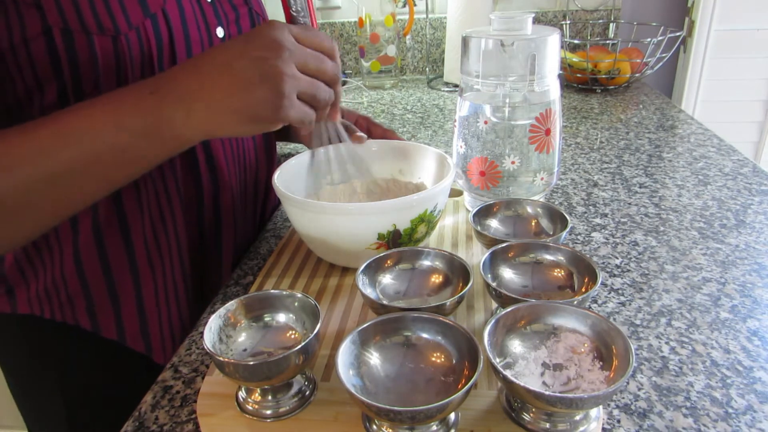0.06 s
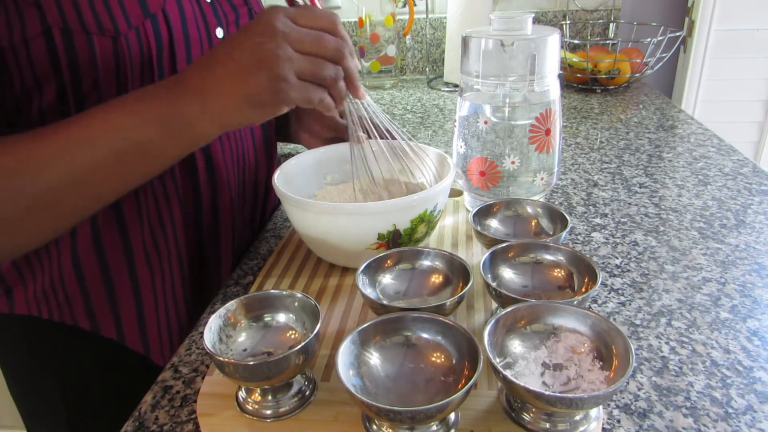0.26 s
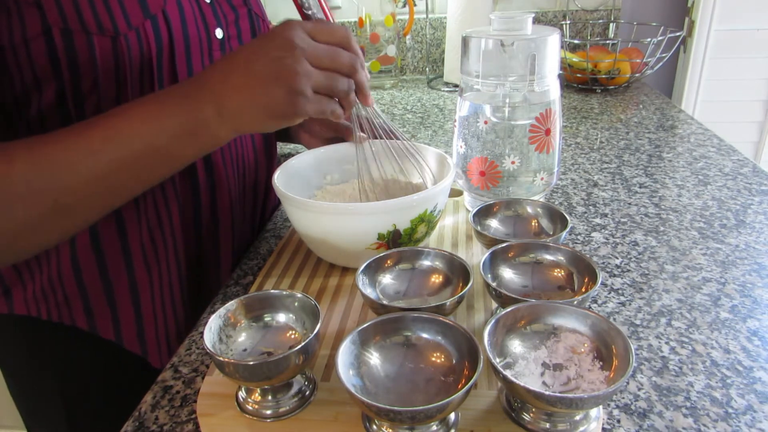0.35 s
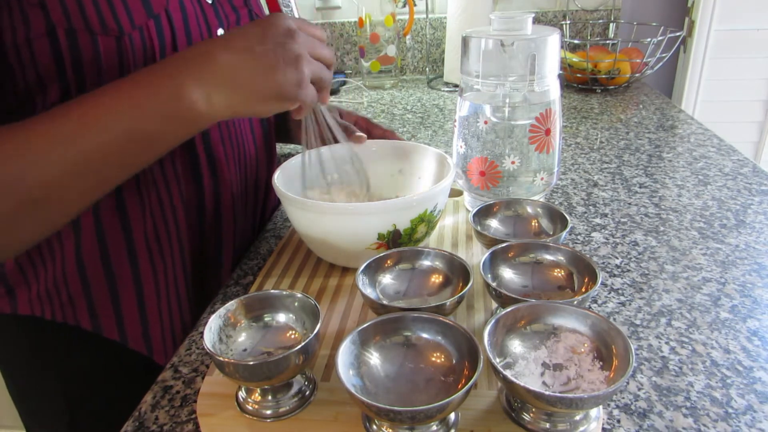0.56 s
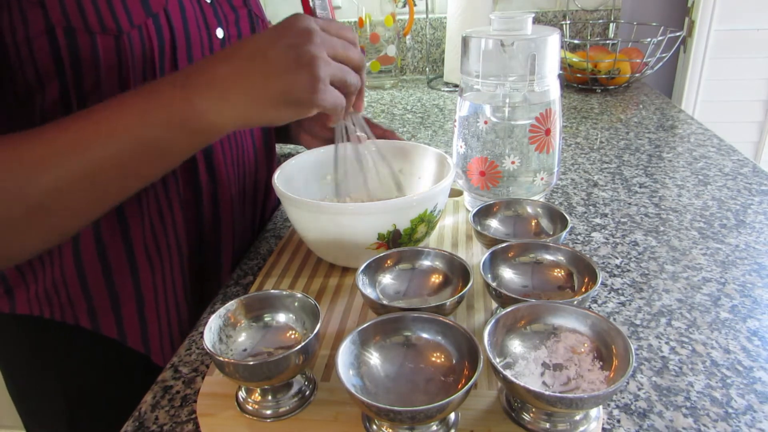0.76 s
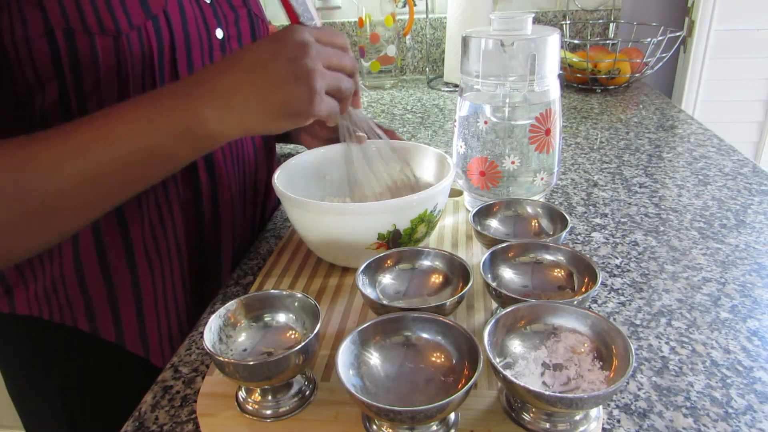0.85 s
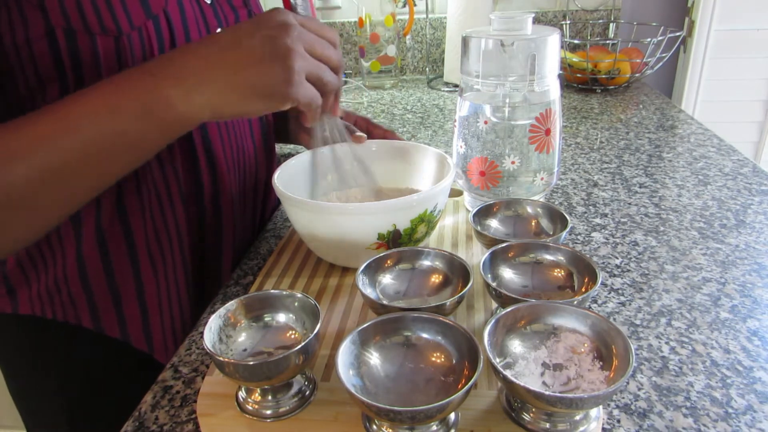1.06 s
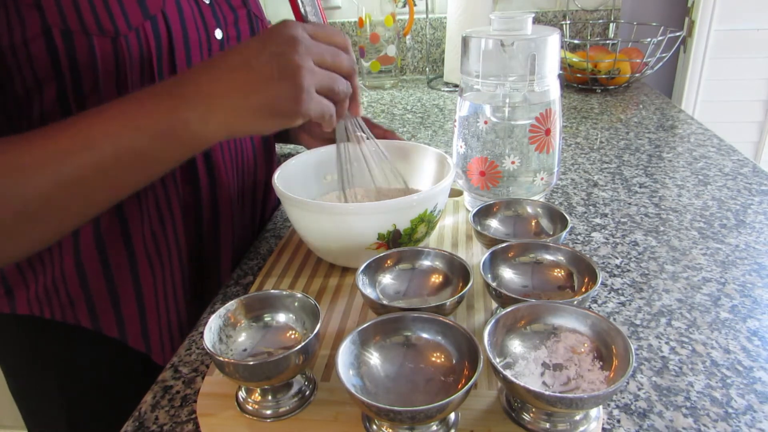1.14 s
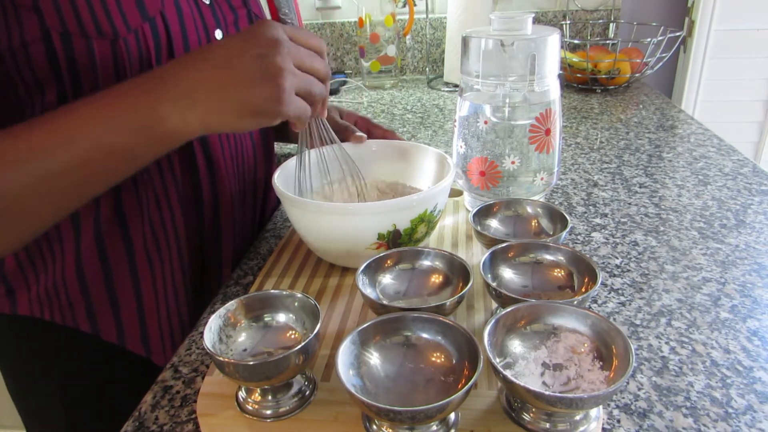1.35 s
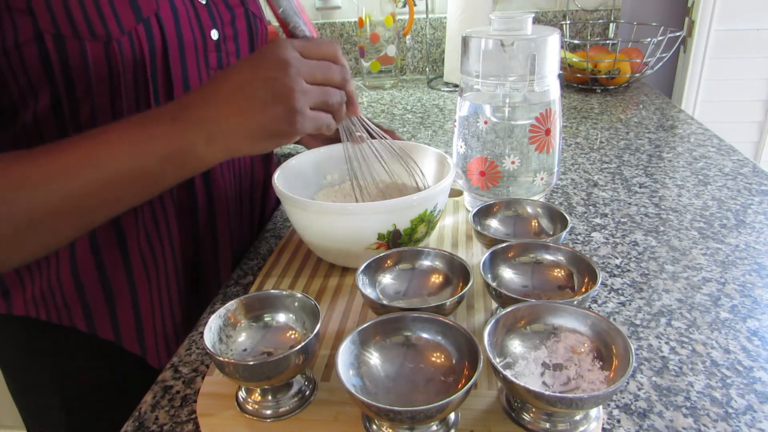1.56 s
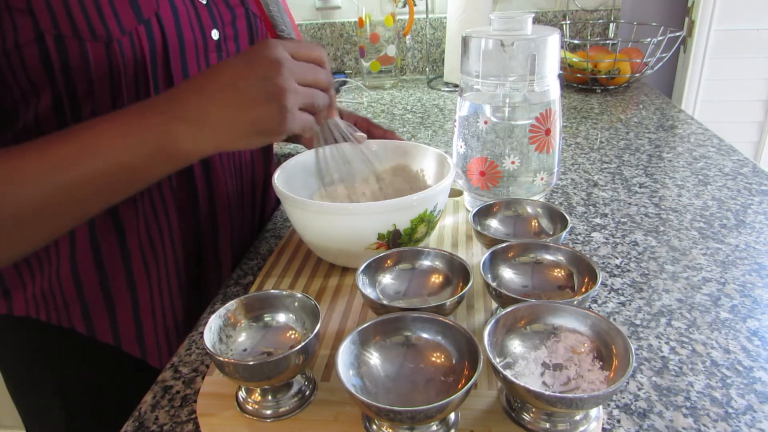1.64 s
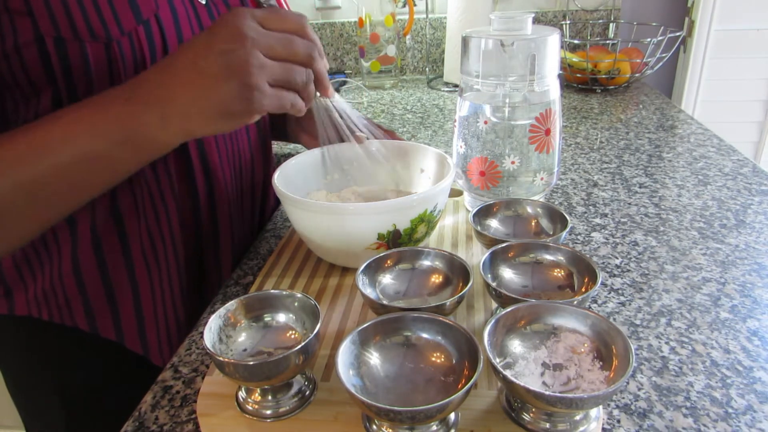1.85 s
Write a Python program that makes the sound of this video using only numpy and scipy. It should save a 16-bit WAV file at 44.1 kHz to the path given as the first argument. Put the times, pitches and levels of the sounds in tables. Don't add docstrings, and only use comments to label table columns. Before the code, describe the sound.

Whisk wires swish through dry powder and clink brightly against a ceramic bowl in a kitchen

```python
import sys
import numpy as np
from scipy import signal
from scipy.fft import rfft, irfft, next_fast_len
from scipy.io import wavfile
from scipy.ndimage import uniform_filter1d, map_coordinates

SR = 44100
rng = np.random.default_rng(int(sys.argv[2]) if len(sys.argv) > 2 else 0)


def attenuation_scalar(level_db):
    decades = np.asarray(level_db, float) / 20
    return 10 ** decades


def file_out(sig):
    cols = np.atleast_2d(sig).T
    lim = np.clip(cols, -1, 1)
    pcm = np.round(lim * 32767).astype(np.int16)
    wavfile.write(sys.argv[1], SR, pcm)


N = 83790


def unit(x):
    return x / np.sqrt(np.mean(x ** 2) + 1e-20)


def along(points, hz):
    f, v = np.transpose(points)
    return np.interp(np.log(hz + 1), np.log(f + 1), v)


def wobble(rate):
    knots = rng.standard_normal(int(N * rate / SR) + 4)
    return map_coordinates(knots, [np.arange(N) * rate / SR])


def filtered(x, response):
    n = x.shape[-1]
    m = next_fast_len(n + 8192)
    return irfft(rfft(x, m) * response(np.fft.rfftfreq(m, 1 / SR)), m)[..., :n]


def shaped_noise(n, curve):
    return unit(filtered(rng.standard_normal(n), lambda f: attenuation_scalar(along(curve, f))))


# start in seconds, then the levels in dB of the low ring,
# second ring, third ring, and the top rings with the click.
TAPS = [(.003, -51, -45, -56, -60), (.2395, -67, -30, -61, -27.5), (.2428, -23.5, -40, -29.5, -25.5),
        (.2555, -28, -55, -80, -35), (.312, -58, -30.5, -41, -48), (.385, -38.5, -42.5, -37, -52),
        (0.496, -41, -39, -58, -57), (0.571, -44.5, -64, -44.5, -51), (.837, -48, -45.5, -55, -44.5),
        (.868, -74, -70, -46.5, -47), (.8864, -61, -69, -58, -45), (.94, -51, -72, -54, -48),
        (1.053, -34, -64, -51, -46), (1.068, -45, -48, -77, -54), (1.256, -78, -68, -67, -52),
        (1.291, -47.5, -63, -48, -45.5), (1.31, -53, -68, -65, -47), (1.395, -48.5, -48, -39.5, -44),
        (1.41, -46, -41.5, -49, -45), (1.5564, -67, -39, -47, -48), (1.5988, -41, -68, -57, -39),
        (1.607, -69, -38, -69, -70), (1.8975, -31, -22.5, -28, -37.5), (1.8993, -27, -41, -20, -27)]
RING_HZ = [1610, 2950, 4620, 8830]
# pitch in Hz, level against the tap in dB, and T60 in seconds.
MODE_HZ = [630, 688, 1075, 1609.5, 2941, 2982, 4608, 4657, 5826, 6575, 8834, 9358, 11411, 14185]
MODE_DB = [-15.5, -21.5, -22, -1.5, -10.5, -21, -7.5, -9, -16, -8.5, -6, -11, -18.5, -16]
MODE_T60 = [.25, .2, .22, .26, .2, .2, .26, .12, .1, .18, .13, .1, .09, .08]
# start in seconds, loss in dB.
CHOKES = [(0.323, 6.4), (.45, 25), (.6, 11), (.91, 4), (1.139, 18), (1.35, 5.1), (1.485, 6.1), (1.582, 6.5),
          (1.68, 5.4)]
# frequency in Hz, level in dB.
CLICK = [(150, -44), (450, -3), (1500, -1.5), (3000, -2.5), (6000, -2), (10000, -8), (15000, -14)]
MODE_SCATTER_DB, ATTACK_S, CHOKE_S = -0.5, 0.0004, 0.0022
HARD_DB, TOP_RING_LOSS = -24, 0.65
MUFFLE = 1.5
ROUGH_RAD, ROUGH_DB, ROUGH_PER_S = 0.7, 1.5, 60
CLICK_DB, CLICK_T60 = -0.5, 0.053
CLANG_DB, CLANG_T60 = -8.5, 0.37
WIRE_TICKS_DB = 1.5


def unsteady_modes(hz):
    shake = np.array([[wobble(ROUGH_PER_S), wobble(ROUGH_PER_S)] for _ in hz])
    phase = 2 * np.pi * hz * np.arange(N) / SR + ROUGH_RAD * shake[:, 1]
    tones = attenuation_scalar(ROUGH_DB * shake[:, 0]) * np.sin(phase)
    return np.pad(tones, ((0, 0), (0, SR)))


def choke_loss(s, t):
    return sum(loss * np.clip((s + t - start) / CHOKE_S, 0, 1) for start, loss in CHOKES if start > s)


def click_sound(t):
    noise = shaped_noise(len(t), CLICK)
    strike = attenuation_scalar(-60 * t / CLICK_T60)
    jangle = attenuation_scalar(CLANG_DB - 60 * t / CLANG_T60)
    return attenuation_scalar(CLICK_DB) * (strike + jangle) * noise + attenuation_scalar(WIRE_TICKS_DB) * wires(t)


def taps():
    out, t = np.zeros((2, N + SR)), np.arange(SR // 3) / SR
    hz, level, t60 = np.c_[MODE_HZ], np.c_[MODE_DB], np.c_[MODE_T60]
    tones = unsteady_modes(hz)
    fade_db = -60 * (t / t60) ** MUFFLE
    for s, *ring_db, hit_db in TAPS:
        at = round(s * SR)
        top_db = hit_db + TOP_RING_LOSS * (hit_db - HARD_DB)
        tap_db = along(list(zip(RING_HZ, ring_db + [top_db])), hz)
        mode_db = tap_db + level + MODE_SCATTER_DB * rng.standard_normal(hz.shape)
        decay = attenuation_scalar(mode_db + fade_db - choke_loss(s, t))
        ring = (decay * tones[:, at:at + len(t)]).sum(0)
        click = attenuation_scalar(hit_db) * click_sound(t)
        out[:, at:at + len(t)] += np.array([ring, click]) * (1 - np.exp(-t / ATTACK_S))
    return out[:, :N]


LOW_WIRE_HZ, HIGH_WIRE_HZ, WIRE_T60, WIRE_SPREAD_S = 2474, 13220, 0.041, 0.03


def wires(t):
    pitch, late, size = rng.random((16, 3)).T[:, :, None]
    hz = LOW_WIRE_HZ * (HIGH_WIRE_HZ / LOW_WIRE_HZ) ** pitch
    since = np.maximum(t[:SR // 8] - WIRE_SPREAD_S * late ** 2, 0)
    level = attenuation_scalar(along(CLICK, hz) - 16 * size - 60 * since / WIRE_T60)
    ticks = level * np.sin(2 * np.pi * hz * since)
    return np.pad(ticks.sum(0), (0, len(t) - SR // 8))


# time in seconds, effort in dB.
STIR = [(0.0, -52.5), (0.29, -65), (0.412, -48), (0.566, -57.5), (0.82, -54), (0.946, -52), (1.078, -55),
        (1.312, -57.5), (1.496, -52.5), (1.73, -56.5), (1.9, -59.5)]
# frequency in Hz, level in dB.
FLOUR = [(700, -40), (1500, -3), (3000, 1), (5000, -0.5), (7000, -1), (10000, -7.5), (14000, -9.5),
         (16000, -35)]
FLOUR_DB, GRIT_PER_S, GRIT_DB = 2.5, 2500, 2
SING_DB, SING_WIDTH_HZ = 4.5, 45


def bowl_resonance(f):
    width = 1j * f * SING_WIDTH_HZ
    return sum(attenuation_scalar(db) * width / (c * c - f * f + width) for c, db in zip(MODE_HZ, MODE_DB))


def flour():
    s, db = np.transpose(STIR)
    effort = attenuation_scalar(np.interp(np.arange(N) / SR, s, db) + FLOUR_DB + 0.5 * wobble(22.74))
    grains = rng.random(N) < GRIT_PER_S / SR
    grit = grains * rng.standard_normal(N) * attenuation_scalar(GRIT_DB * rng.exponential(size=N))
    rub = effort * unit(unit(grit) + 0.97 * rng.standard_normal(N))
    hiss = filtered(rub, lambda f: attenuation_scalar(along(FLOUR, f)))
    return hiss + attenuation_scalar(SING_DB) * filtered(rub, bowl_resonance)


# start in seconds, level in dB, pitch in Hz.
THUDS = [(0.256, -34, 152.5), (0.249, -35.5, 202.6), (.243, -33.5, 490), (0.291, -34, 122),
         (.35, -32, 148.5), (.575, -41, 891), (0.891, -33, 159.4), (1.057, -46, 1080), (1.059, -37, 235),
         (1.06, -38, 539.5), (1.34, -38, 187.5), (1.396, -41, 1048), (1.4, -41, 574), (1.462, -35, 146),
         (1.609, -29, 148), (1.599, -37, 303.4)]
# frequency in Hz, level in dB.
PUFF = [(80, -60), (220, -3), (600, 4.5), (1300, 3.5), (3500, -11), (6000, -60)]
THUD_RISE_S, THUD_T60, THUD_ROUGH_RAD = 0.0098, 0.17, 0.3
PUFF_DB, PUFF_T60 = -10, 0.12


def board():
    out, t = np.zeros(N + SR), np.arange(SR // 2) / SR
    for s, db, hz in THUDS:
        phase = 2 * np.pi * hz * t + THUD_ROUGH_RAD * wobble(38)[:len(t)]
        note = attenuation_scalar(-60 * t / THUD_T60) * np.sin(phase)
        puff = attenuation_scalar(PUFF_DB - 60 * t / PUFF_T60) * shaped_noise(len(t), PUFF)
        rise = 1 - np.exp(-t / THUD_RISE_S)
        out[round(s * SR):][:len(t)] += attenuation_scalar(db) * rise * (note + puff)
    return out[:N]


# frequency in Hz, T60 in seconds.
KITCHEN = [(200, 1), (1600, 0.85), (5000, 0.73), (12000, .35)]


def kitchen(x):
    hz, t, z = signal.stft(rng.standard_normal((2, SR // 2)), SR, nperseg=256)
    decay = attenuation_scalar(-60 * t / along(KITCHEN, hz)[:, None])
    tail = signal.istft(z * decay, SR, nperseg=256)[1]
    late = np.pad(x, (300, 0))[None]
    return signal.fftconvolve(late, tail / np.linalg.norm(tail[0]), axes=1)[:, :N]


# frequency in Hz, rms level in dB, left lead in radians.
HUM = [(49, -49, 0.97), (60, -59.5, 0.28), (99.6, -50.5, 1.12), (124.7, -58, 1.8), (148.95, -53, 0.86),
       (191.8, -52.5, 2.04), (261.1, -58, 1.5), (301.7, -64, 1.26), (358.4, -51, 1.94)]
HUM_SHAKE_DB, HUM_DRIFT = 0.5, 0.08


def fridge():
    t, half = np.arange(N) / SR, np.array([[0.5], [-0.5]])
    hum = np.zeros((2, N))
    for hz, db, lead in HUM:
        level = np.sqrt(2) * attenuation_scalar(db + HUM_SHAKE_DB * hz / 100 * wobble(6.26))
        drift = HUM_DRIFT * hz / 50 * wobble(3.4)
        hum += level * np.sin(2 * np.pi * (hz * t + rng.random()) + drift + lead * half)
    return hum


# frequency in Hz, level in dB.
AIR = [(40, -38), (95, -27), (150, -9), (290, -6.5), (640, -12.5), (2980, -23.5), (11600, -38),
       (15500, -44)]
# frequency in Hz, likeness from 0 to 1.
ALIKE = [(40, .8), (100, 0.52), (200, 0.11), (400, 0.017), (1500, 0.033), (8000, 0.067)]
AIR_DB, LEFT_DB = -45.5, -0.48


def mid_side_response(hz):
    turn = np.arccos(np.clip(along(ALIKE, hz), -1, 1)) / 2
    return attenuation_scalar(along(AIR, hz)) * np.array([np.cos(turn), np.sin(turn)])


def air():
    z = signal.stft(rng.standard_normal((2, N)), nperseg=512)[2]
    field = uniform_filter1d(rng.standard_normal(z.shape[1:]), size=6, axis=0)
    patches = attenuation_scalar(0.33 * unit(uniform_filter1d(field, size=14, axis=1)))
    pair = signal.istft(z * patches, nperseg=512)[1][:, :N]
    mid, side = filtered(pair, mid_side_response)
    noise = attenuation_scalar(AIR_DB) * unit(np.array([mid + side, mid - side]))
    return (noise + fridge()) * attenuation_scalar([[LEFT_DB], [-LEFT_DB]])


PAN_DB, WET_DB, RING_WET_DB = -0.38, -6, -14


def scene():
    ring, click = taps()
    rest = click + board() + flour()
    close = (ring + rest) * attenuation_scalar([[PAN_DB], [-PAN_DB]])
    echo = kitchen(attenuation_scalar(RING_WET_DB) * ring + attenuation_scalar(WET_DB) * rest)
    return close + echo + air()


# multiple of NOTCH_HZ, width in Hz, depth from 0 to 1.
NOTCHES = [(1, 420, 0.77), (2, 133, 1)]
NOTCH_HZ, TOP_HZ, TOP_ORDER = 3920, 14300, 24


def microphone_body(f):
    response = 1 / (1 + (f / TOP_HZ) ** TOP_ORDER)
    for multiple, width, depth in NOTCHES:
        band = 1j * f * width
        response = response * (1 - np.clip(depth, 0, 1) * band / ((multiple * NOTCH_HZ) ** 2 - f * f + band))
    return response


def roll_off(x):
    return signal.sosfilt(signal.butter(12, 15610, fs=SR, output="sos"), x)


def record(dry):
    mix = filtered(dry, microphone_body)
    return roll_off(mix)


dry = scene()
out = record(dry)
file_out(out)
```